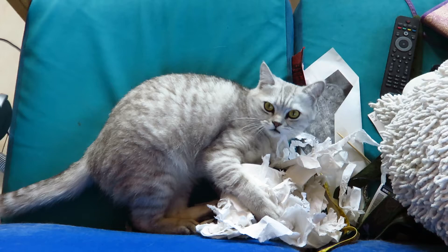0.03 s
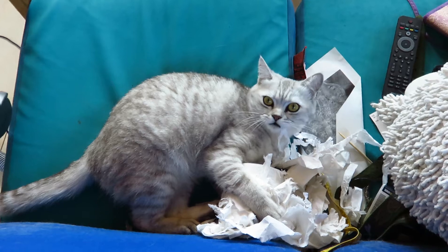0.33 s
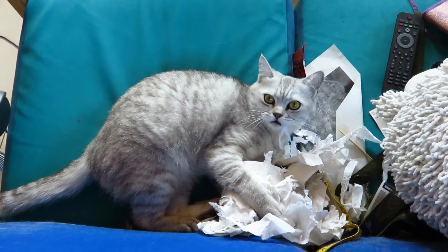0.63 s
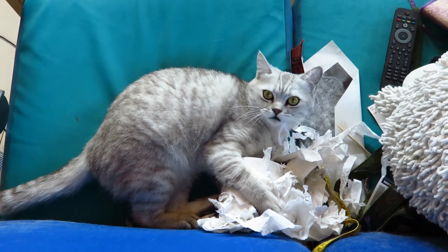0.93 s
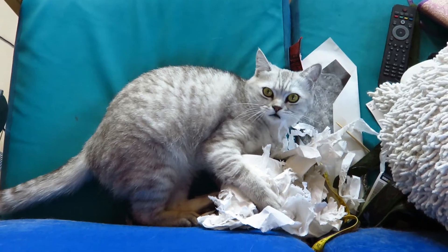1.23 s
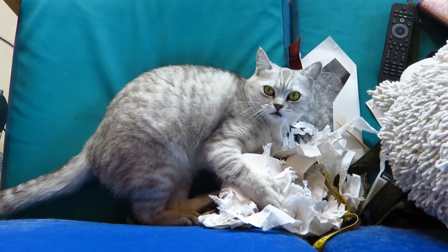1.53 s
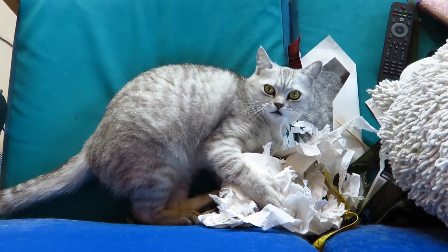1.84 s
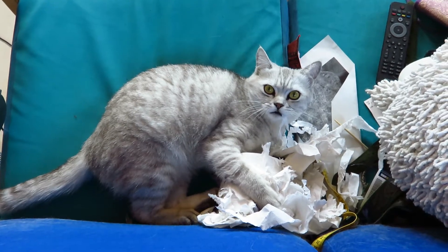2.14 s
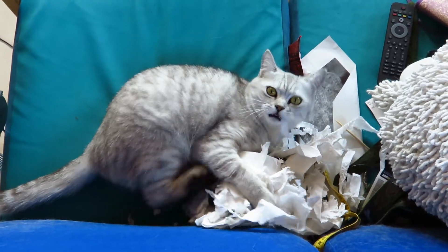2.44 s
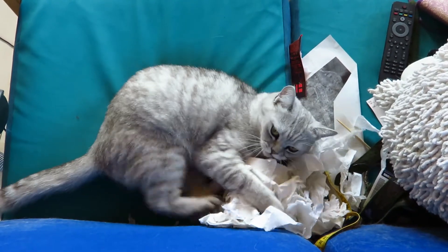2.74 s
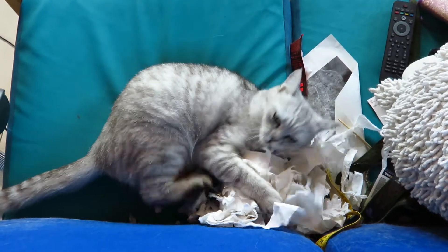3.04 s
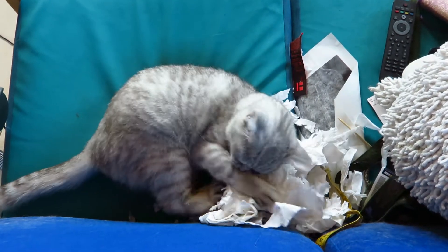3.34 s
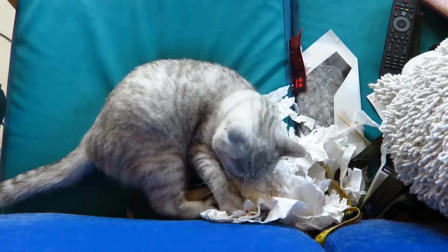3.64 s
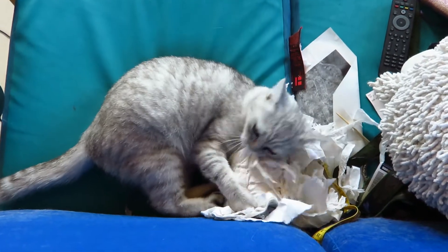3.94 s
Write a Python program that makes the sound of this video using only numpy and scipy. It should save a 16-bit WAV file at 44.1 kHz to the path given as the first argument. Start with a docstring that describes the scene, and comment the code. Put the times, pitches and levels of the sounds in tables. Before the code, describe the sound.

Shredded paper rustles close to the microphone as a cat paws at it on a couch. After a mostly still start with faint room noise and low hum, a flurry of dry crackles, dull pops and snaps follows.

```python
"""Steady room noise and a low electrical hum, throbbing briefly at first, fill a quiet room.
Close by, a cat kicks and paws at a heap of shredded paper on a couch, sparsely, then in a flurry.
Sheets buckle under the paw with a dull pop and a dry snap. Each stroke drags the strips over each
other in a swell of tiny crackles, and a few single fibres break with a bright click."""
import sys
import numpy as np
from scipy import signal
from scipy.fft import rfft, irfft
from scipy.io import wavfile

SR = 44100
rng = np.random.default_rng(int(sys.argv[2]) if len(sys.argv) > 2 else 0)


def dump(signal):
    """Clip the signal to [-1, 1] and save it as 16-bit WAV at the path in sys.argv[1]."""
    limited = np.clip(np.atleast_2d(signal).T, -1, 1)
    pcm = np.round(limited * 32767).astype(np.int16)
    wavfile.write(sys.argv[1], SR, pcm)


N = 176400
TIME_S = np.arange(N) / SR
BINS_HZ = np.fft.rfftfreq(N, 1 / SR)


def amp(db):
    return 10 ** (np.asarray(db) / 20)


def curve_at(points, hz):
    point_hz, value = np.transpose(points)
    return np.interp(np.log(hz + 1), np.log(point_hz + 1), value)


def add(mix, start_s, sound):
    part = mix[round(start_s * SR):][:len(sound)]
    part += sound[:len(part)]


def drift(hz):
    """Random wander below about hz, unit RMS."""
    wander = irfft(rfft(rng.standard_normal(N)) * np.exp(-(BINS_HZ / hz) ** 2), N)
    return wander / np.sqrt(np.mean(wander ** 2) + 1e-20)


def coloured(pair, colour, width):
    """Two unrelated signals become stereo of given spectrum and width, mid at unit RMS."""
    spectra = rfft(pair) * amp(curve_at(colour, BINS_HZ))
    mid = irfft(spectra[0], N)
    side = irfft(spectra[1] * amp(curve_at(width, BINS_HZ)), N)
    return np.array([mid + side, mid - side]) / np.std(mid)


# room noise spectrum: f/Hz, relative density/dB
NOISE_SPECTRUM = [(15, -33), (37, -11), (54, -13.5), (70, -3.5), (85, -8.5), (103, -7.5), (126, -9),
                  (150, -8), (232, -10), (427, -12.5), (500, -12.5), (590, -12.5), (620, -7.5), (655, -12),
                  (767, -13.5), (1070, -15), (1350, -15), (1800, -18.5), (2450, -18), (3300, -23),
                  (4500, -26), (6500, -32.5), (9000, -38.5), (12400, -44.5), (14000, -47.5), (15500, -58)]
# room noise width: f/Hz, side minus mid/dB
NOISE_WIDTH = [(40, -20), (70, -10), (110, 4), (160, 5), (240, 9), (400, 8), (700, 3.5), (1290, -1),
               (2380, -4.5), (4400, -5.5), (8120, -3.5), (15000, 3)]


def room_noise(level_db=-49):
    """Steady, dull, wide noise."""
    return amp(level_db) * coloured(rng.standard_normal((2, N)), NOISE_SPECTRUM, NOISE_WIDTH)


# hum partials: f/Hz, level/dB
HUM_PARTIALS = [(49.7, -65), (99.7, -56.5)]
# throb envelope: t/s, level/dB
THROB_ENVELOPE = [(.07, -55.5), (.1, -49), (.15, -49.5), (.23, -48), (.265, -45), (.29, -67), (.36, -51),
                  (.42, -82)]
START_S = 0.0714


def electrical_hum(waver_db=0.95, wander_rad=0.31, octave_db=-6):
    """Two low partials waver in level and phase; a brief throb opens them."""
    hum = np.zeros(N)
    for hz, db in HUM_PARTIALS:
        level = amp(db + waver_db * drift(hz=1.9))
        hum += level * np.sin(2 * np.pi * hz * TIME_S + wander_rad * drift(hz=14))
    phase = 2 * np.pi * HUM_PARTIALS[0][0] * (TIME_S - START_S)
    envelope = amp(np.interp(TIME_S, *np.transpose(THROB_ENVELOPE)))
    throb = envelope * (np.cos(phase) + amp(octave_db) * np.cos(2 * phase))
    return np.sqrt(2) * (hum + throb)


def pulse(hz, focus, phasor=1):
    """Pressure pulse around hz, centred in 20 ms; higher focus narrows the band."""
    t = np.arange(-SR // 100, SR // 100) / SR
    return (phasor * (1 - 2j * np.pi * hz * t / focus) ** -(focus + 1)).real


def ring(modes, detune=0.029, rise_s=0.00067):
    """Damped modes, detuned at random: loose paper never rings the same twice."""
    t = np.arange(SR // 16) / SR
    out = np.zeros(len(t))
    for hz, db, t60_s in modes:
        detuned_hz = hz * (1 + detune * (2 * rng.random() - 1))
        out += amp(db - 60 * t / t60_s) * np.cos(2 * np.pi * detuned_hz * t)
    return out * (1 - np.exp(-t / rise_s))


# buckling sheets: t/s, pop (level/dB, f/Hz, focus), snap (level/dB, f/Hz, focus), tick level/dB
SHEET_BUCKLES = [(0.2717, -42, 900, 3.1, -37, 1850, 16, -68), (2.161, -47, 600, 2.5, -37, 2130, 20, -52),
                 (2.8065, -37, 600, 8, -41, 1700, 5, -60), (2.8221, -16, 420, 3.2, -17.5, 2140, 21, -28.5),
                 (2.8308, -27, 450, 2.3, -34, 2200, 19, -50),
                 (3.0267, -11.5, 610, 10, -25.5, 2220, 25, -47),
                 (3.0275, -18.5, 740, 8.2, -33, 1700, 6, -46), (3.0295, -24, 600, 4, -28, 2200, 18, -48),
                 (3.036, -24, 327, 3.3, -32, 1394, 7, -50), (3.0412, -27, 300, 4, -36, 1300, 5, -50),
                 (3.0512, -24.5, 210, 6.8, -23, 1600, 6, -45), (3.083, -30.5, 200, 2.4, -44, 1300, 5, -55),
                 (3.0845, -21, 750, 2.7, -14, 1610, 13, -37), (3.0843, -34, 700, 2.5, -21, 3240, 38, -49),
                 (3.0963, -37, 500, 2.5, -33, 1870, 33, -50), (3.478, -30, 560, 4, -24.5, 1810, 24, -48),
                 (3.4790, -44, 600, 2.2, -33, 1880, 25, -48),
                 (3.4813, -27.5, 400, 2.5, -23, 1890, 9.6, -44),
                 (3.5388, -22, 430, 2.9, -23, 1880, 11, -48), (3.5494, -35, 500, 5, -32, 1900, 9, -56),
                 (3.621, -32.5, 700, 2.9, -38, 3200, 16, -46),
                 (3.6365, -14.5, 515, 2.1, -27.5, 2000, 11, -50), (3.645, -37, 620, 5, -40, 1800, 10, -52),
                 (3.6754, -28.5, 600, 2.4, -48, 3000, 2.65, -38),
                 (3.9197, -46, 700, 2.5, -25, 1800, 14, -41), (3.9286, -42, 700, 2.3, -29, 1750, 14, -48),
                 (3.952, -41, 690, 2.5, -36, 2000, 4.6, -44), (3.966, -38, 700, 2.3, -27, 1700, 8, -45),
                 (3.9816, -42, 800, 2.5, -31, 2100, 9.1, -46),
                 (3.9831, -35, 800, 2.5, -22.5, 1860, 6.7, -32)]
# heap modes: f/Hz, level re pop/dB, T60/s
HEAP_RING = [(263, -12.5, 0.049), (344, -21.5, 0.08), (463, -24, 0.12), (590, -17, 0.047),
             (695, -18, 0.042)]
# sheet modes: f/Hz, level re snap/dB, T60/s
SHEET_RING = [(1424, -22, 0.034), (1880, -49, 0.047), (2240, -22, 0.023), (3150, -24, 0.0056)]


def buckling_sheets(snap_lead_s=0.00033, tick_hz=5100):
    """A sheet snaps with a sharp tick, air pushed out of the heap pops, and both ring briefly."""
    out = np.zeros(N)
    for at_s, pop_db, pop_hz, pop_focus, snap_db, snap_hz, snap_focus, tick_db in SHEET_BUCKLES:
        pop = amp(pop_db) * pulse(pop_hz, pop_focus)
        snap = amp(snap_db) * pulse(snap_hz, snap_focus, phasor=-1j)
        tick = amp(tick_db) * pulse(tick_hz, focus=7.3)
        start_s = at_s - len(pop) / 2 / SR
        add(out, start_s - snap_lead_s, snap + tick)
        add(out, start_s, pop)
        add(out, at_s, amp(pop_db) * ring(HEAP_RING) + amp(snap_db) * ring(SHEET_RING))
    return out


def grains(per_s, spread_db):
    """Two trains of random clicks; spread makes a few much larger than the rest."""
    size = amp(spread_db * np.minimum(rng.exponential(1, (2, N)), 4))
    polarity = rng.choice([-1., 1.], (2, N))
    return size * polarity * (rng.random((2, N)) < per_s / SR)


# paw strokes: peak t/s, rise/s, fall/s, scuff level/dB, crackle level/dB, fizz level/dB
PAW_STROKES = [(1.72, 0.072, 0.037, -52.5, -76, -90), (2.34, .03, .02, -66, -71, -68),
               (2.59, 0.061, 0.087, -54.5, -51, -60), (2.772, 0.016, .035, -64, -43, -54),
               (2.809, 0.0075, .02, -44, -48, -58), (2.835, 0.0091, .012, -38, -42.5, -58),
               (2.86, .018, 0.017, -43.5, -47, -54.5), (2.93, .05, .05, -66, -54, -63.5),
               (3.016, 0.021, .015, -47, -44.5, -54), (3.033, 0.011, .008, -32.5, -37, -49.5),
               (3.053, 0.0099, .010, -31.5, -33.5, -46), (3.063, 0.013, 0.017, -38, -37.5, -45),
               (3.093, 0.013, 0.009, -35.5, -40.5, -58), (3.135, .022, 0.019, -43, -46.5, -54),
               (3.26, .04, 0.023, -54.5, -65, -62), (3.392, 0.047, .014, -49.5, -46.5, -57.5),
               (3.488, .005, 0.0057, -39.5, -43.5, -60), (3.505, 0.048, 0.037, -50, -49.5, -57.5),
               (3.547, .008, 0.0054, -43.5, -46, -57), (3.602, 0.02, 0.029, -45.5, -44, -53.5),
               (3.645, 0.0067, 0.0095, -41.5, -50, -60), (3.674, 0.019, 0.023, -42, -48.5, -58),
               (3.855, 0.046, 0.087, -52, -51.5, -60), (3.948, 0.02, 0.022, -58, -44.5, -52.5),
               (3.99, 0.024, .05, -52.5, -42.5, -51.5)]
# spectra of heap, strips and fibres: f/Hz, relative density/dB
SCUFF_SPECTRUM = [(40, -40), (90, -10), (128, 4), (260, 3.5), (380, -1), (480, 3), (580, 1), (700, 2),
                  (950, -4.5), (1800, -4.5), (4000, -51)]
CRACKLE_SPECTRUM = [(200, 0), (700, -0.5), (950, -7), (1150, 1), (1380, 1), (1600, -5.5), (1900, 2),
                    (2300, -1), (2800, -2.5), (3600, -5.5), (4600, -16.5), (8000, -26)]
FIZZ_SPECTRUM = [(1500, -5), (4000, -1), (5500, 3), (6700, 0.5), (7800, -2), (9000, -1.5), (11000, -0.5),
                 (13000, 1.5), (14500, -6), (15700, -12)]
# rustle width: f/Hz, side minus mid/dB
RUSTLE_WIDTH = [(100, -26), (1000, -17), (2300, -20), (4500, -11), (14000, -11)]


def paw_rustle(swell_exponent=1.18, catch_db=1.0, catch_hz=130):
    """Each stroke swells and dies in small catches: the heap scuffs, strips crackle, fibres fizz."""
    power = np.zeros((3, N))
    for peak_s, rise_s, fall_s, *levels_db in PAW_STROKES:
        from_peak = abs(TIME_S - peak_s) / np.where(TIME_S < peak_s, rise_s, fall_s)
        power += amp(levels_db)[:, None] ** 2 * np.exp(-from_peak ** swell_exponent)
    scuff = coloured(grains(per_s=2500, spread_db=0), SCUFF_SPECTRUM, RUSTLE_WIDTH)
    crackle = coloured(grains(per_s=4000, spread_db=3.5), CRACKLE_SPECTRUM, RUSTLE_WIDTH)
    fizz = coloured(grains(per_s=12000, spread_db=3.5), FIZZ_SPECTRUM, RUSTLE_WIDTH)
    catches = amp(catch_db * drift(catch_hz))
    return catches * sum(swell * layer for swell, layer in zip(np.sqrt(power), (scuff, crackle, fizz)))


# fibre breaks: t/s, level/dB, f/Hz
FIBRE_BREAKS = [(2.429, -44, 13000), (3.391, -42, 8000), (3.479, -37, 12500), (3.9358, -29, 10500),
                (3.965, -35, 11000)]


def breaking_fibres():
    """Single fibres give way with a tiny, bright click."""
    out = np.zeros(N)
    for at_s, db, hz in FIBRE_BREAKS:
        click = amp(db) * pulse(hz, focus=6)
        add(out, at_s - len(click) / 2 / SR, click)
    return out


# room decay: f/Hz, T60/s
ROOM_DECAY = [(100, 0.57), (400, 0.75), (1500, 0.15), (5000, 0.2), (15000, .12)]
# echoes off nearby surfaces: left delay/s, right delay/s, level/dB
NEAR_ECHOES = [(.0036, 0.005, -27), (.0087, 0.0073, -28), (0.0128, .0109, -42), (0.0139, 0.011, -30)]


def room(sound, tail_db=-21, treble_db=-15, corner_hz=900, onset_s=0.0055):
    """Direct sound, a few close echoes and a short, dull tail."""
    t = np.arange(SR // 2) / SR
    hz, frame_s, spectra = signal.stft(rng.standard_normal((2, len(t))), SR, nperseg=256)
    decay = amp(-60 * frame_s / curve_at(ROOM_DECAY, hz)[:, None])
    shelf = amp(treble_db * hz / (hz + corner_hz))[:, None]
    tail = signal.istft(spectra * decay * shelf, SR, nperseg=256)[1][:, :len(t)]
    tail *= 1 - np.exp(-(t / onset_s) ** 2)
    response = amp(tail_db) * tail / np.linalg.norm(tail[0])
    response[:, 0] += 1  # direct path
    for left_s, right_s, db in NEAR_ECHOES:
        response[[0, 1], [round(left_s * SR), round(right_s * SR)]] += amp(db)
    return signal.fftconvolve(sound[None], response, axes=1)[:, :N]


def scene(pan_db=0.3):
    """Paper slightly to the left, over noise and hum."""
    paper = paw_rustle() + room(buckling_sheets() + breaking_fibres())
    return paper * amp([[pan_db], [-pan_db]]) + room_noise() + electrical_hum()


def record(dry, fade_s=0.016, cutoff_hz=15600):
    """A moment of silence, a quick fade-in, then a low-pass."""
    fade_in = np.clip((TIME_S - START_S) / fade_s, 0, 1)
    lowpass = signal.firwin(511, cutoff_hz, window=("kaiser", 9), fs=SR)
    return signal.oaconvolve(dry * fade_in, lowpass[None], "same")


dry = scene()
out = record(dry)
dump(out)
```